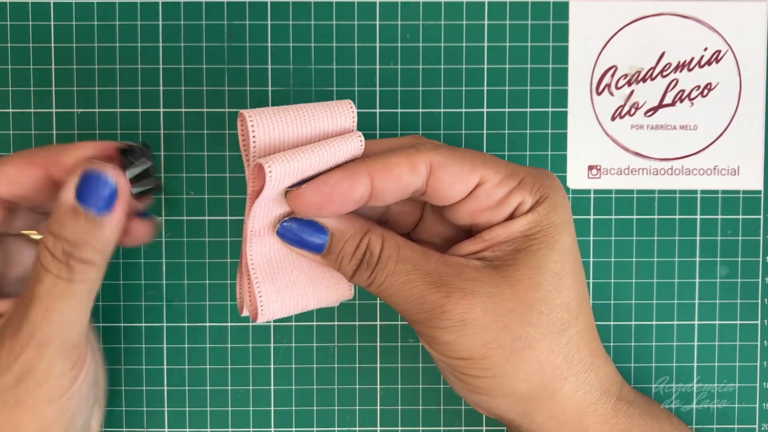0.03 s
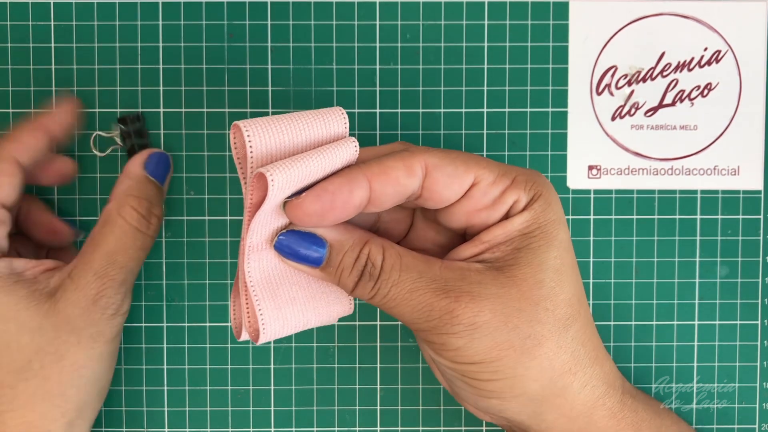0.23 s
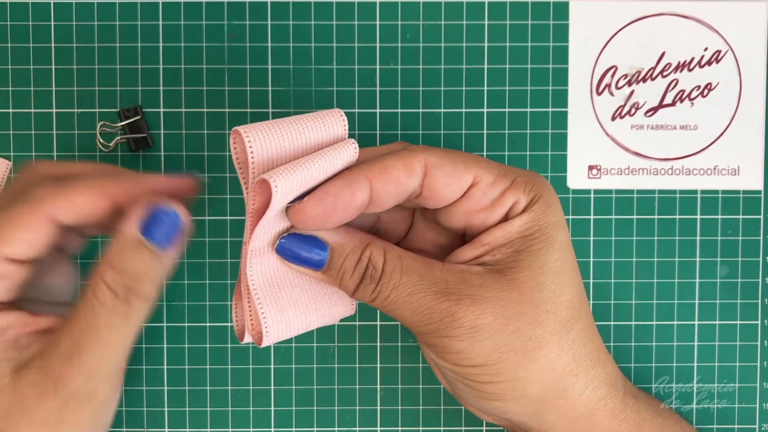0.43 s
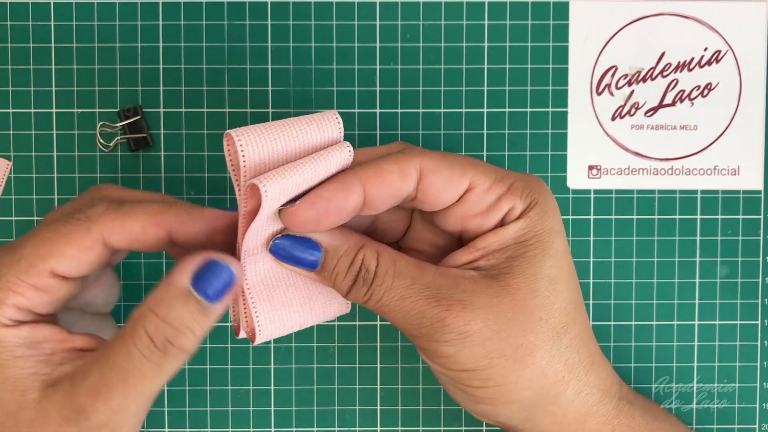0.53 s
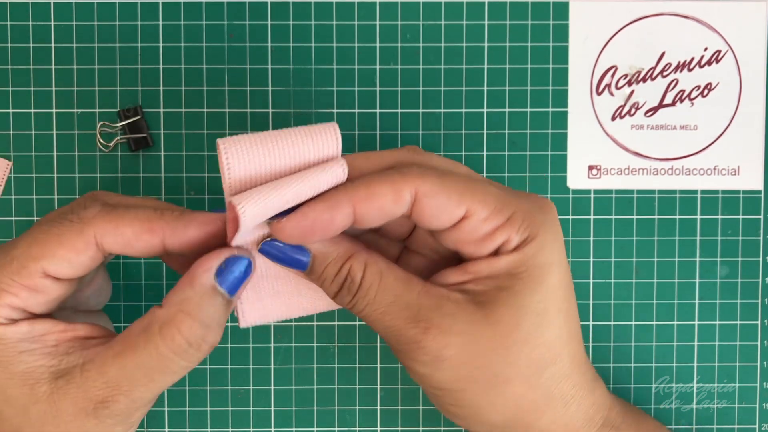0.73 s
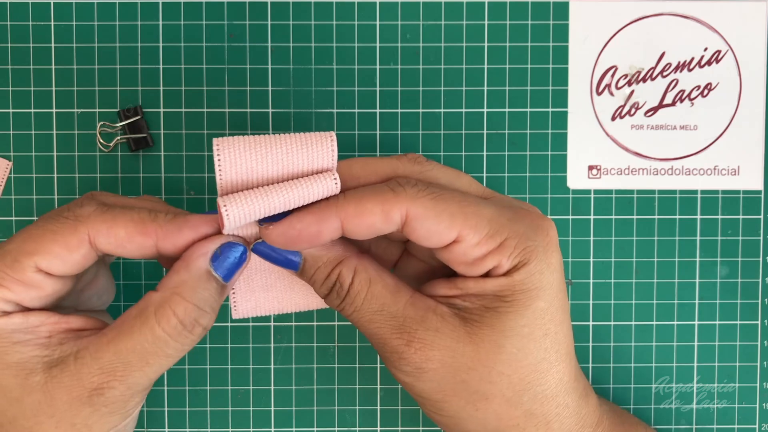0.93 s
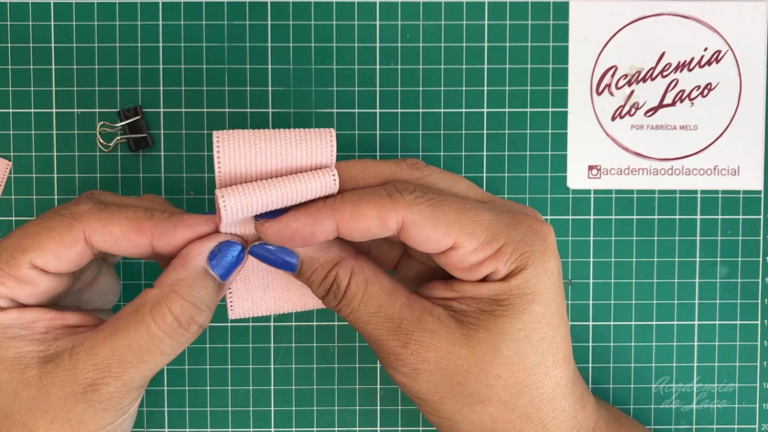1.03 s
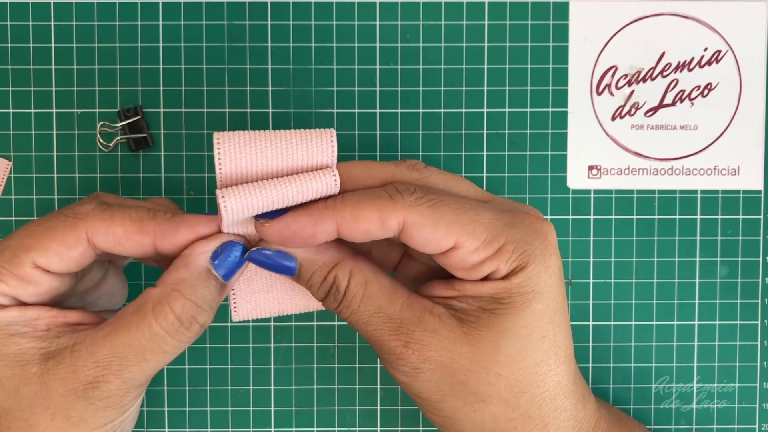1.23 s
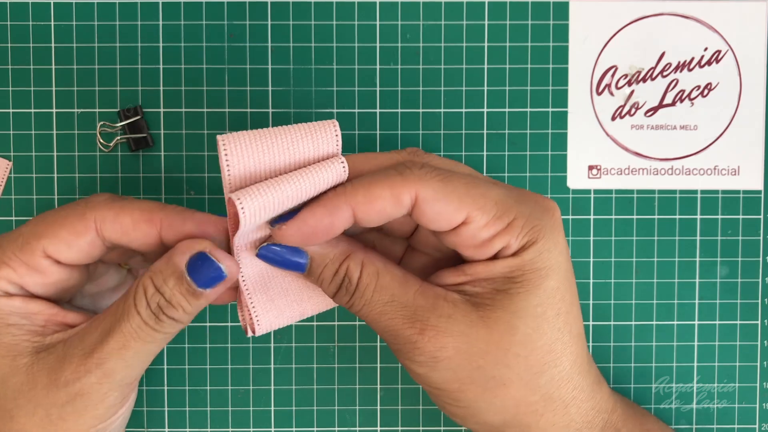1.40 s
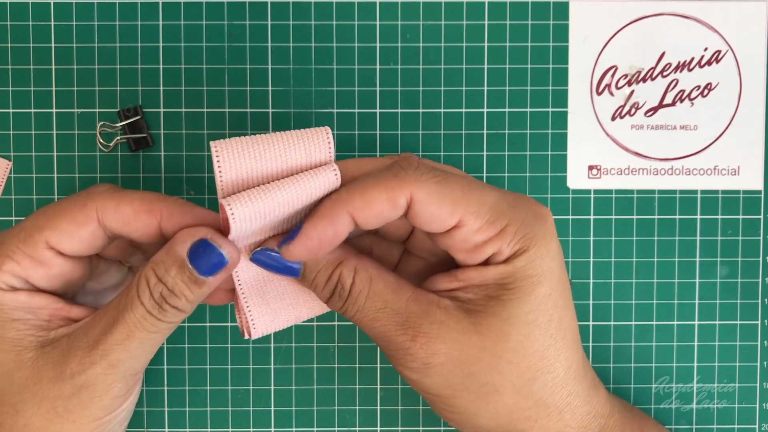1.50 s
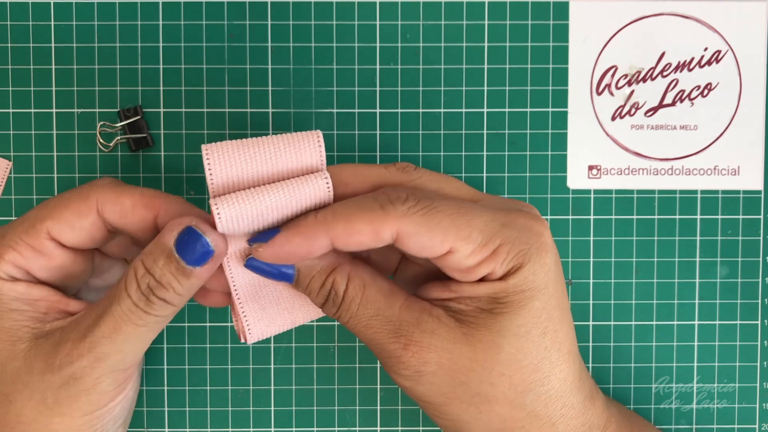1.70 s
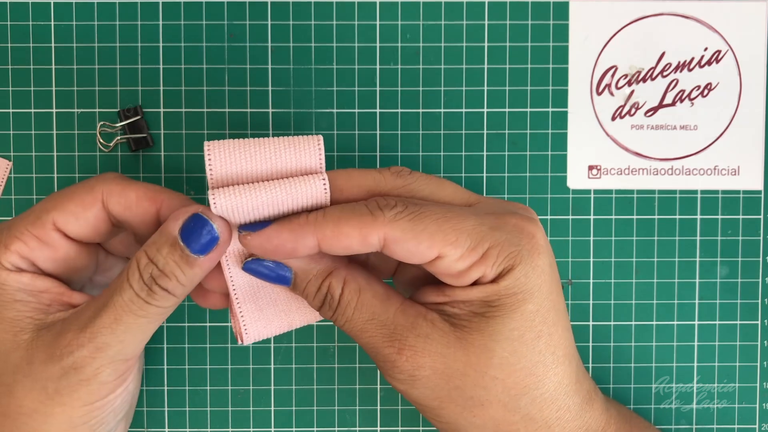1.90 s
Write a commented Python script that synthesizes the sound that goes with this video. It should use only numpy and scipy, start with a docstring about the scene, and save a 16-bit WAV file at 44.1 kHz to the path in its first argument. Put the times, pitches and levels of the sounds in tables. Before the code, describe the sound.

A steel clip knocks and rattles onto a mat, then faint ribbon handling over low hum.

```python
"""Binder clip dropped on a cutting mat

A steel binder clip, just pulled off a ribbon, ticks in the fingers and drops on the mat: it knocks
the desk, tumbles and bounces, wire handles rattling against the spring body. Fingers then fold the
ribbon, with one fingernail click. A small room hums underneath, low and wavering."""
import sys
import numpy as np
from scipy import signal
from scipy.fft import rfft, irfft, next_fast_len
from scipy.io import wavfile
from scipy.ndimage import map_coordinates

SR = 44100
rng = np.random.default_rng(int(sys.argv[2]) if len(sys.argv) > 2 else 0)


def persist_wave(psi):
    """Save psi, clipped to +-1, as 16-bit WAV."""
    counts = np.round(np.clip(psi, -1, 1) * 32767).astype(np.int16)
    wavfile.write(sys.argv[1], SR, np.atleast_2d(counts).T)


N = 85995
T = np.arange(SR // 2) / SR  # time since a blow, s


def amp(db):
    """Decibels to gain."""
    return 10 ** (np.asarray(db) / 20)


def unit_rms(x):
    """Scale to rms 1."""
    return x / np.sqrt(np.mean(x ** 2) + 1e-20)


def log_interp(points, hz):
    """Interpolate (f/Hz, value) points over log frequency."""
    point_hz, values = np.transpose(points)
    return np.interp(np.log(hz + 1), np.log(point_hz + 1), values)


def decay(t60_s, hold_s=0):
    """Exponential decay, starting after hold_s."""
    return np.exp(-np.log(1000) * np.maximum(T - hold_s, 0) / t60_s)


def attack(rise_s):
    """Exponential rise to 1."""
    return 1 - np.exp(-T / rise_s)


def wobble(knots_per_s):
    """Smooth random curve, rms near 1."""
    knots = rng.standard_normal(int(N * knots_per_s / SR) + 4)
    return map_coordinates(knots, [np.arange(N) * knots_per_s / SR])


def tone(hz):
    """Sine of rms 1 following a frequency curve."""
    return np.sqrt(2) * np.sin(2 * np.pi * np.cumsum(hz) / SR)


def noise(spectrum):
    """Coloured noise of rms 1."""
    gain = amp(log_interp(spectrum, np.fft.rfftfreq(N, 1 / SR)))
    return unit_rms(irfft(rfft(rng.standard_normal(N)) * gain, N))


def burst(spectrum, envelope):
    """Causally filtered noise burst with the energy of its envelope."""
    size = len(T)
    gain = amp(log_interp(spectrum, np.fft.rfftfreq(size, 1 / SR)))
    cepstrum = irfft(np.log(gain), size)
    min_phase = np.exp(rfft(2 * cepstrum * (T > 0) * (T < T[-1] / 2)))
    x = irfft(rfft(rng.standard_normal(size) * envelope) * min_phase, size)
    return x * np.linalg.norm(envelope) / np.linalg.norm(x)


def ring(modes, t60_scale=1, rise_s=0.0004, scatter_db=1.5):
    """Damped modes; level and phase vary per strike."""
    x = np.zeros(len(T))
    for hz, db, t60_s in modes:
        envelope = amp(db + scatter_db * rng.normal()) * decay(t60_s * t60_scale)
        x += envelope * np.sin(2 * np.pi * (hz * T + rng.random()))
    return x * attack(rise_s) / np.linalg.norm([amp(db) for _, db, _ in modes])


def add(track, start_s, x):
    """Mix x into the track at start_s."""
    part = track[round(start_s * SR):][:len(x)]
    part += x[:len(part)]


# hum envelope: t/s, level/dB
HUM_LEVELS = [(0.0, -45), (0.016, -51.5), (0.184, -59.5), (0.254, -44), (0.406, -48), (0.558, -57),
              (0.618, -46), (0.672, -42.5), (0.884, -57.5), (1.222, -45.5), (1.264, -60), (1.374, -53),
              (1.432, -61), (1.488, -47), (1.678, -50.5), (1.808, -64), (1.884, -52.5), (1.95, -57.5)]
# faint unsteady tones: f/Hz, level/dB
DRONE_TONES = [(263.8, -69), (586.8, -72.5)]
# room air spectrum: f/Hz, relative level/dB
AIR_SPECTRUM = [(20, -18), (45, 4.5), (80, -1), (170, 3.5), (215, -2), (275, -1.5), (370, -11.5), (480, -9),
                (620, -6.5), (800, -11), (1000, -16.5), (2000, -22.5), (4000, -27.5), (8000, -35.5),
                (15500, -39.5), (16300, -60)]


def room_tone(hum_hz=122.2, hum_drift_hz=1.6, drone_drift_hz=14, drone_swing_db=3, air_db=-54.5):
    """Low hum that swells and sinks, faint higher tones and steady air noise."""
    hum_db = np.interp(np.arange(N) / SR, *np.transpose(HUM_LEVELS))
    hum = amp(hum_db) * tone(hum_hz + hum_drift_hz * wobble(10))
    drone = sum(amp(db + drone_swing_db * wobble(4.7)) * tone(hz + drone_drift_hz * wobble(25))
                for hz, db in DRONE_TONES)
    return hum + drone + amp(air_db) * noise(AIR_SPECTRUM)


# clip ticks: t/s, click level/dB, ring f/Hz, ring level/dB
CLIP_TICKS = [(.0665, -44, 15430, -58), (0.089, -37, 15600, -22), (.0902, -47, 8500, -30),
              (.1022, -46, 4032, -45.5), (0.104, -53.5, 15420, -37)]
# click spectrum: f/Hz, relative level/dB
TICK_SPECTRUM = [(500, -30.5), (2800, -20), (5000, -11), (9000, -1), (15500, 0), (17000, -12)]


def clip_ticks(click_t60_s=0.0097, ring_t60_s=0.01393):
    """The held clip clicks; the fingers damp its single mode at once."""
    out = np.zeros(N)
    for start_s, click_db, hz, ring_db in CLIP_TICKS:
        click = amp(click_db) * burst(TICK_SPECTRUM, decay(click_t60_s))
        add(out, start_s, click + amp(ring_db) * ring([(hz, 0, ring_t60_s)]))
    return out


# finger strokes: t/s, length/s, level/dB
RIBBON_STROKES = [(0.198, 0.063, -56.5), (.54, 0.1, -63.5), (.79, .04, -71), (1.079, 0.066, -69),
                  (1.126, 0.0875, -69), (1.358, 0.027, -64.5), (1.68, 0.042, -70)]
# friction spectrum: f/Hz, relative level/dB
RIBBON_SPECTRUM = [(300, 1.5), (1500, 4.5), (5000, -5.5), (9000, -9), (15500, -8.5), (17000, -38.5)]


def ribbon_rubs(grain_db=3, grains_per_s=400):
    """Skin rubs ribbed cloth in short grainy strokes."""
    envelope = np.zeros(N)
    for start_s, length_s, db in RIBBON_STROKES:
        arch = np.abs(np.sin(np.pi * np.minimum(T / length_s, 1)))
        add(envelope, start_s, amp(db) * np.sqrt(arch))
    friction = noise(RIBBON_SPECTRUM) * amp(grain_db * wobble(grains_per_s))
    return envelope * unit_rms(friction)


# clip contacts: t/s, knock level/dB, crack level/dB, body level/dB, handle level/dB, metal t60 scale
CLIP_CONTACTS = [(.2482, -12.5, -26, -37, -38, 1.1), (0.2623, -34, -50, -40.5, -22, 1.05),
                 (0.2766, -24, -35, -29, -19.5, 0.72), (.2875, -37, -37.5, -32, -30, 0.89),
                 (.3060, -32, -48, -37.5, -36.5, 2.6), (.3288, -25.5, -7, -16, -35.5, .6),
                 (.3400, -35, -35, -27, -38.5, 0.703), (.3763, -38, -13, -18.5, -44.5, 1.2),
                 (0.3816, -52.5, -28, -17, -46.5, 0.42), (.3957, -38, -24.5, -22.5, -44, 1.25),
                 (.4010, -58, -24.5, -23, -52, 0.83), (.4058, -51, -28.5, -24.5, -48, 0.64)]
# knock on the mat: f/Hz, relative level/dB
KNOCK_SPECTRUM = [(50, -33.5), (90, -18), (160, -1.5), (370, -11), (520, -4), (720, 2), (930, -11.5),
                  (1400, -9.5), (2050, -6), (2500, -18.5), (3000, -8), (3600, -21.5), (4700, -13),
                  (6500, -27.5), (16000, -43)]
# steel crack: f/Hz, relative level/dB
CRACK_SPECTRUM = [(300, -24), (550, -10.5), (1100, -23.5), (2200, -9.5), (4000, -6.5), (5500, -2.5),
                  (6100, -3.5), (6600, -10), (8000, -2), (9300, -0.5), (10200, -3.5), (12000, -2.5),
                  (14000, 3.5), (15600, -12.5), (17000, -19.5)]
# spring body modes: f/Hz, relative level/dB, free t60/s
BODY_MODES = [(2040, -17, .11), (2870, -21, .12), (6120, 1, .095), (7597, -10, .11), (7657, -7, .12),
              (7935, -10, .1), (8080, -6, .08), (8560, -10, .07), (9625, -10, .08), (10600, -11, .08),
              (12100, -7, .08), (12220, -2, .115), (12478, -4, .1), (12990, -11, .07), (15010, -10, .06),
              (15530, -9, .06)]
# wire handle modes: f/Hz, relative level/dB, free t60/s
HANDLE_MODES = [(1405, -5, .1), (1619, -2, .11), (1691, -4, .11), (1932, -3, .12), (2040, -3, .12),
                (2351, -5, .09), (2600, -4, .1), (2977, 0, .07), (4107, -1, .07), (4458, 0, .08),
                (4619, -2, .07), (4759, -3, .07), (8050, -2, .06), (8550, -4, .06), (10590, -12, .07),
                (12140, -12, .07)]
# modes of the desk under the mat: f/Hz, relative level/dB, t60/s
DESK_MODES = [(135, -1.5, 0.059), (191.5, -5.5, .16), (300, -2, .1), (697, -4, 0.16), (756, 0.5, .14),
              (988, -12.5, .14), (1237, 2.5, 0.09), (1504, 3.5, .05)]


def clip_drop(knock_t60_s=0.021, knock_rise_s=0.00042, crack_t60_s=0.0079,
              choke_t60_s=0.016, desk_re_knock_db=-7):
    """Each contact knocks the desk, cracks, and rings the metal until the next one chokes it."""
    blows, rings = np.zeros(N), np.zeros(N)
    flights_s = np.append(np.diff([row[0] for row in CLIP_CONTACTS]), T[-1])
    for contact, flight_s in zip(CLIP_CONTACTS, flights_s):
        start_s, knock_db, crack_db, body_db, handle_db, t60_scale = contact
        knock = amp(knock_db) * burst(KNOCK_SPECTRUM, decay(knock_t60_s) * attack(knock_rise_s))
        crack = amp(crack_db) * burst(CRACK_SPECTRUM, decay(crack_t60_s))
        add(blows, start_s, knock + crack)
        body = amp(body_db) * ring(BODY_MODES, t60_scale)
        handles = amp(handle_db) * ring(HANDLE_MODES, t60_scale)
        desk = amp(knock_db + desk_re_knock_db) * ring(DESK_MODES)
        choke = decay(choke_t60_s, hold_s=flight_s)
        add(rings, start_s, desk + choke * (body + handles))
    return blows, rings


# nail snap spectrum: f/Hz, relative level/dB
NAIL_SPECTRUM = [(500, -31), (2500, -3.5), (4500, -7), (7000, -3.5), (11000, -3.5), (15200, 1.5),
                 (16500, -21)]
# nail modes: f/Hz, relative level/dB, t60/s
FINGERNAIL_MODES = [(1490, -10, 0.033), (3124, -4, 0.016), (4340, 3, 0.008), (5750, -7, 0.016)]


def fingernail(start_s=1.066, snap_db=-35.5, snap_t60_s=0.0081, ring_db=-37):
    """One nail snaps past another and rings very briefly."""
    out = np.zeros(N)
    snap = amp(snap_db) * burst(NAIL_SPECTRUM, decay(snap_t60_s))
    add(out, start_s, snap + amp(ring_db) * ring(FINGERNAIL_MODES))
    return out


# room decay: f/Hz, t60/s
ROOM_T60 = [(150, 0.79), (1000, 0.63), (4000, .43), (9000, 0.25), (16000, 0.26)]


def room(x, send_db, early_re_send_db=-6, early_t60_s=0.075, early_gap_s=0.0017,
         tail_re_send_db=-12.5, tail_gap_s=0.0054):
    """Direct sound, quick reflections off the desk and nearby things, then a soft tail."""
    early = rng.standard_normal(len(T)) * decay(early_t60_s) * (T > early_gap_s)
    hz, t, bands = signal.stft(rng.standard_normal(len(T)), SR, nperseg=256)
    band_decay = np.exp(-np.log(1000) * t / log_interp(ROOM_T60, hz)[:, None])
    tail = signal.istft(bands * band_decay, SR)[1][:len(T)] * (T > tail_gap_s)
    response = amp(early_re_send_db) * early / np.linalg.norm(early)
    response += amp(tail_re_send_db) * tail / np.linalg.norm(tail)
    return x + amp(send_db) * signal.fftconvolve(x, response)[:N]


def scene():
    """Mono mix over the hum; blows and rubs excite the room more than rings and ticks."""
    blows, rings = clip_drop()
    blows_and_rubs = room(blows + fingernail() + ribbon_rubs(), send_db=-1)
    rings_and_ticks = room(rings + clip_ticks(), send_db=-9)
    return (blows_and_rubs + rings_and_ticks + room_tone())[None]


def record(dry):
    """Brick-wall low-pass."""
    cutoff_hz = 17000
    size = next_fast_len(N + SR // 2)
    passband = np.fft.rfftfreq(size, 1 / SR) < cutoff_hz
    return irfft(rfft(dry, size) * passband, size)[:, :N]


dry = scene()
out = record(dry)
persist_wave(out)
```